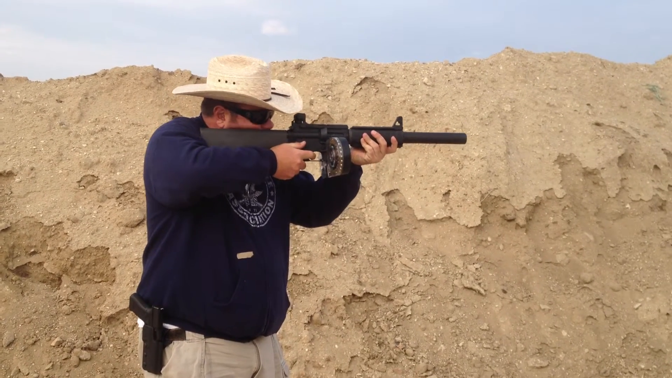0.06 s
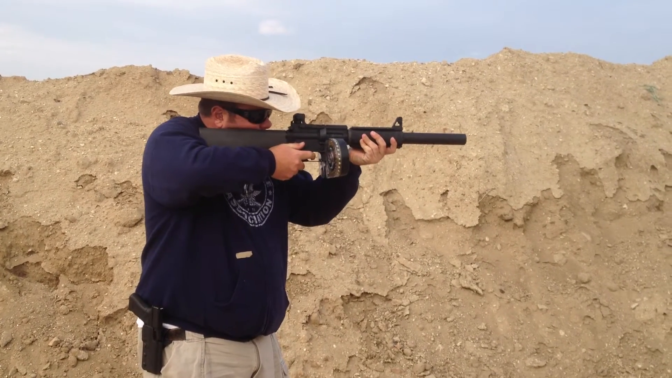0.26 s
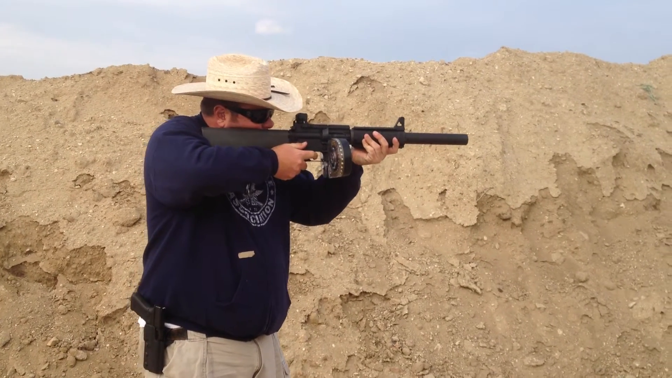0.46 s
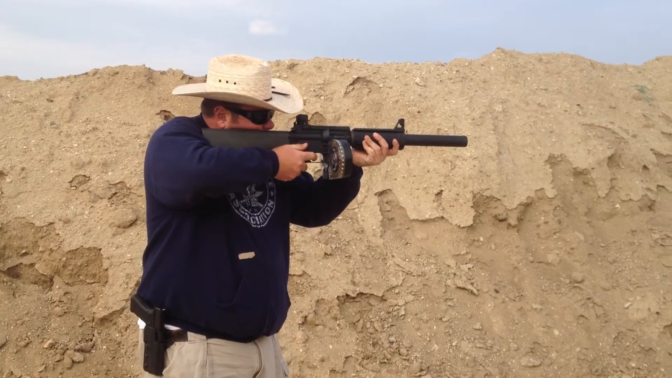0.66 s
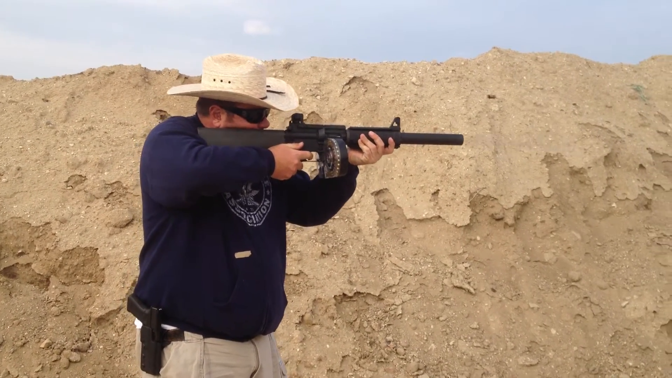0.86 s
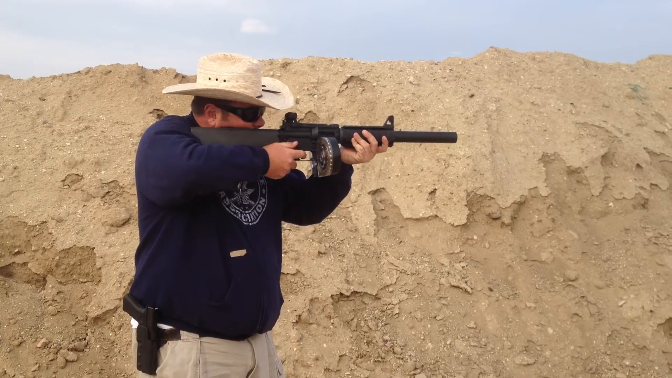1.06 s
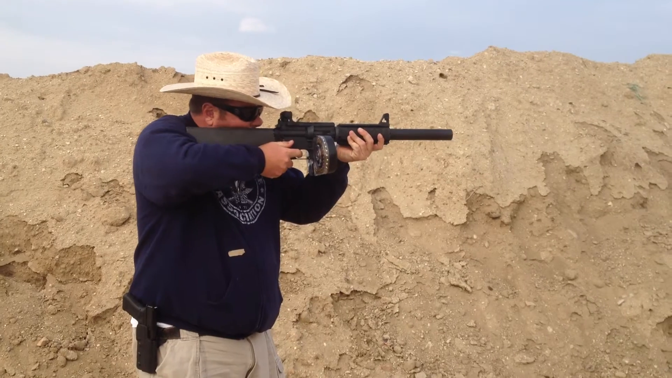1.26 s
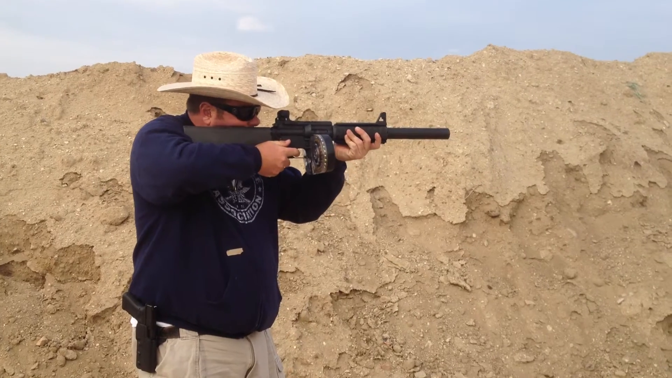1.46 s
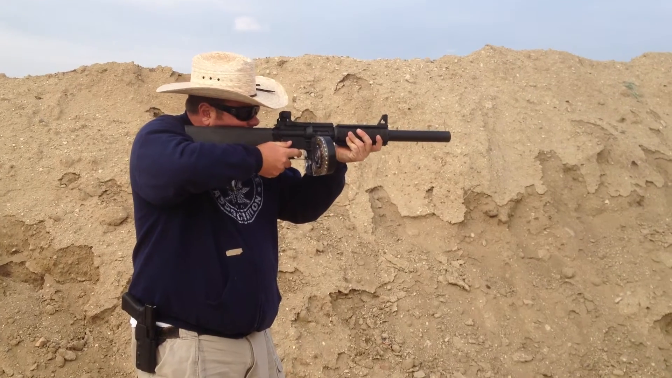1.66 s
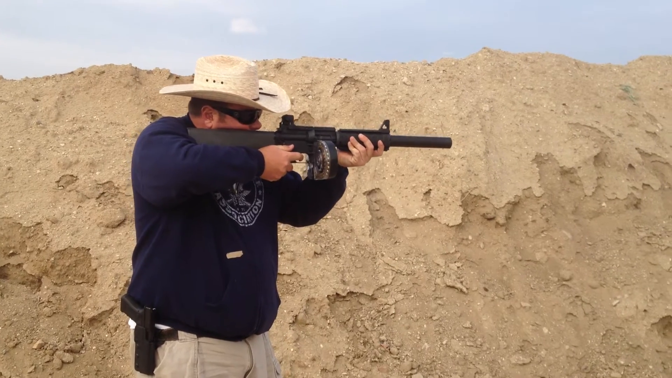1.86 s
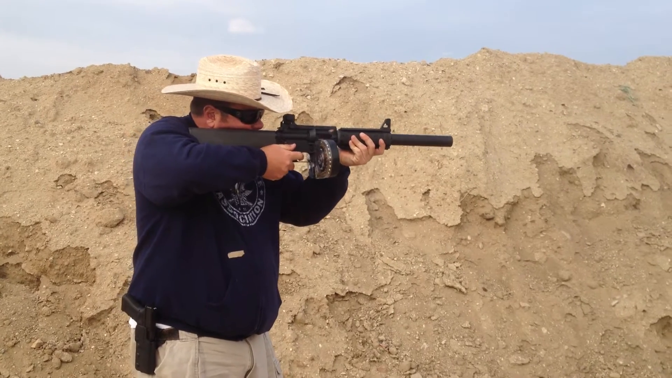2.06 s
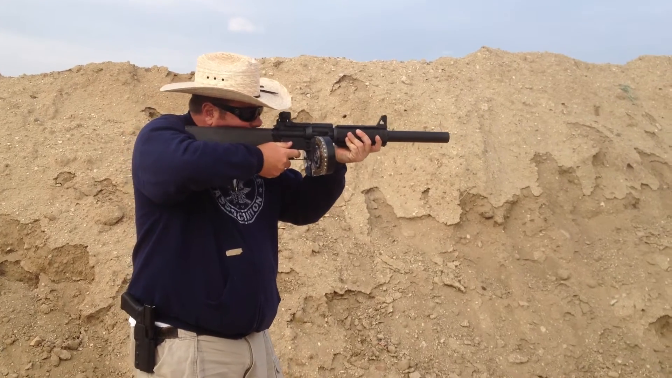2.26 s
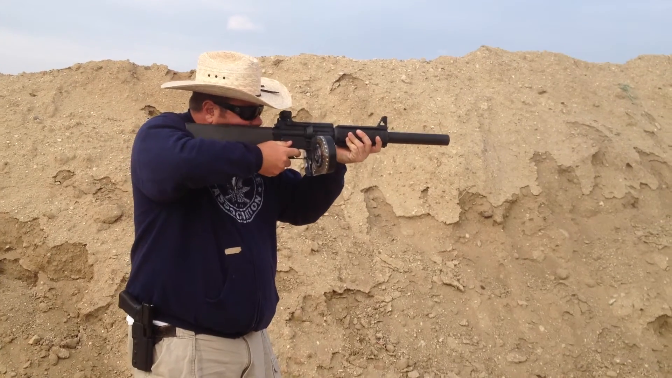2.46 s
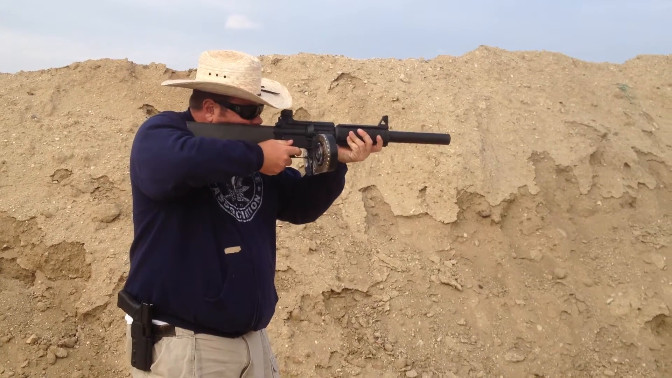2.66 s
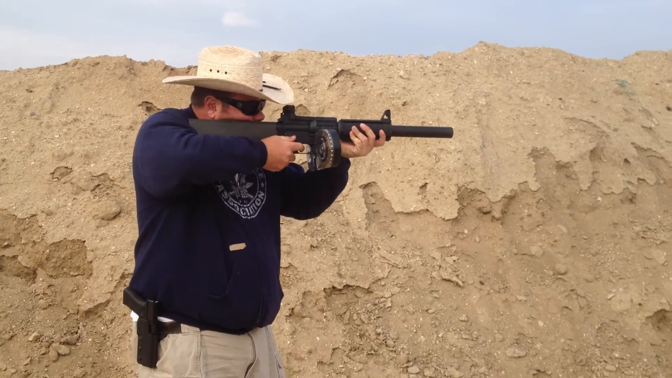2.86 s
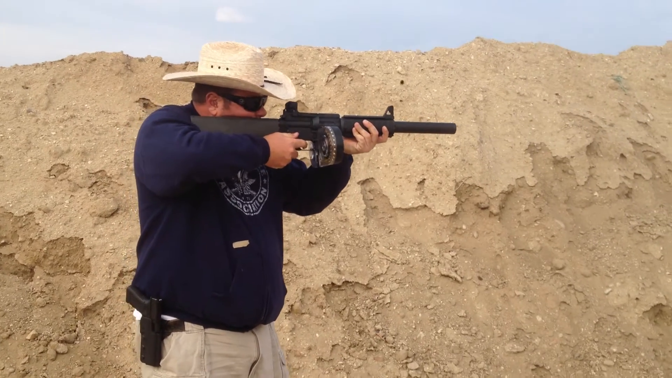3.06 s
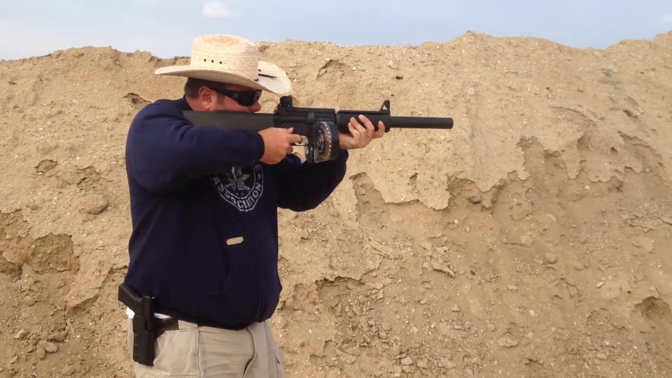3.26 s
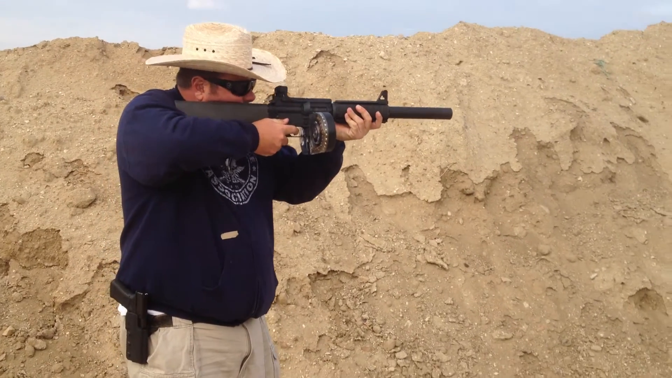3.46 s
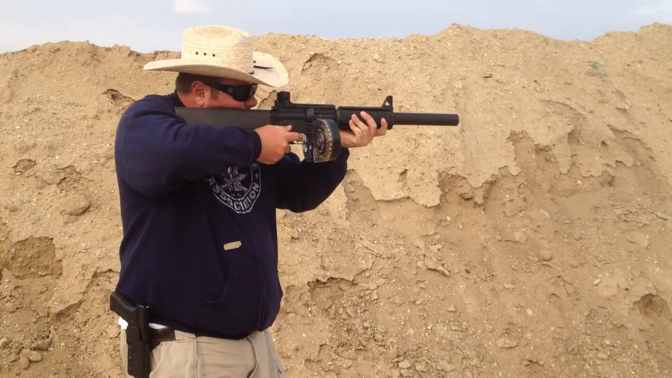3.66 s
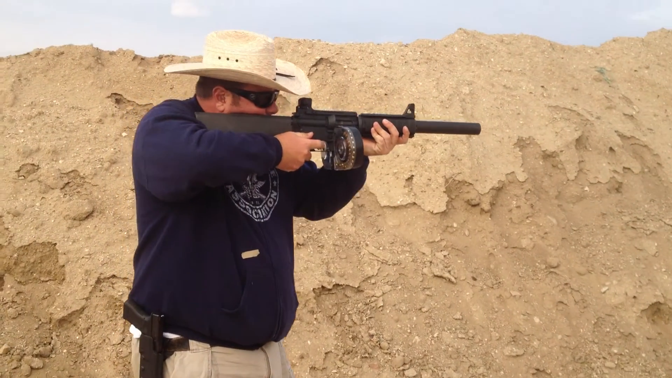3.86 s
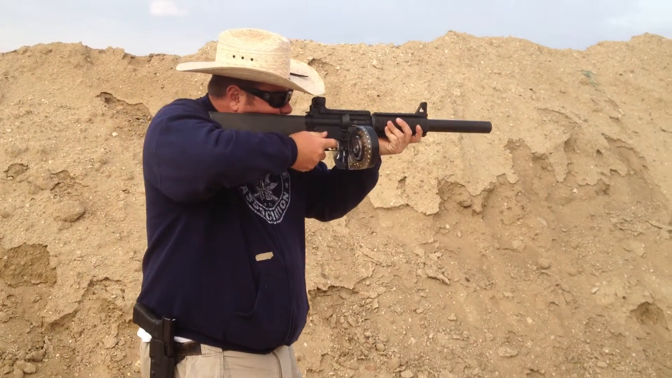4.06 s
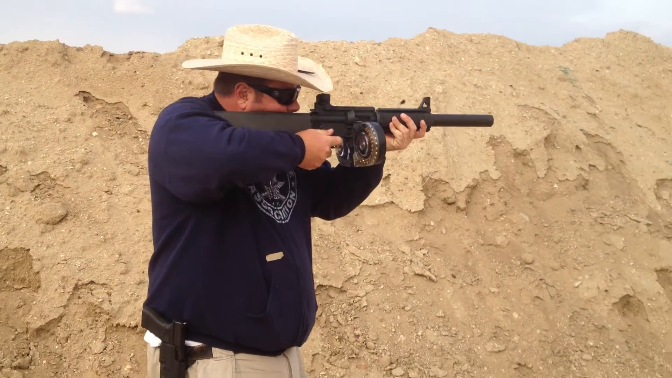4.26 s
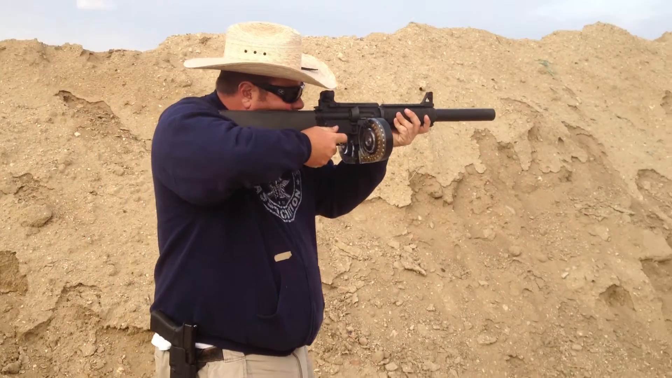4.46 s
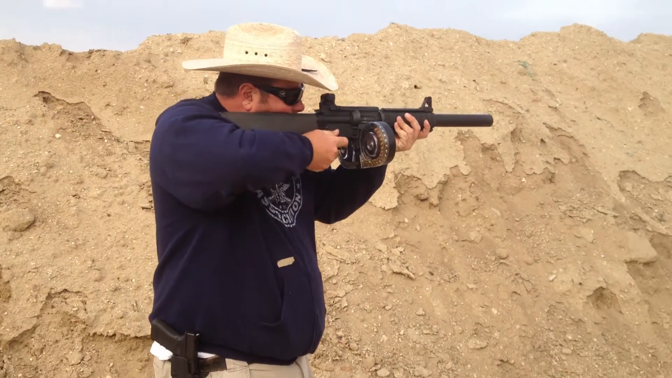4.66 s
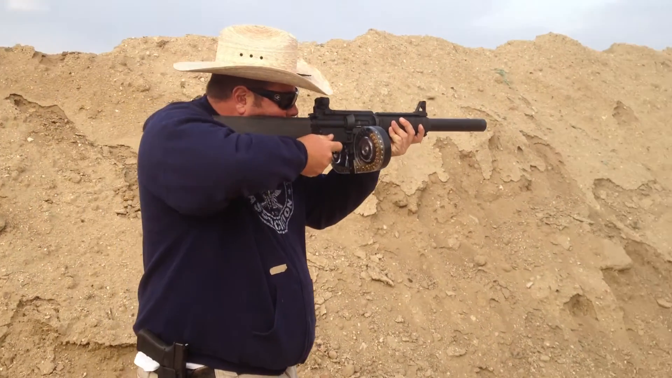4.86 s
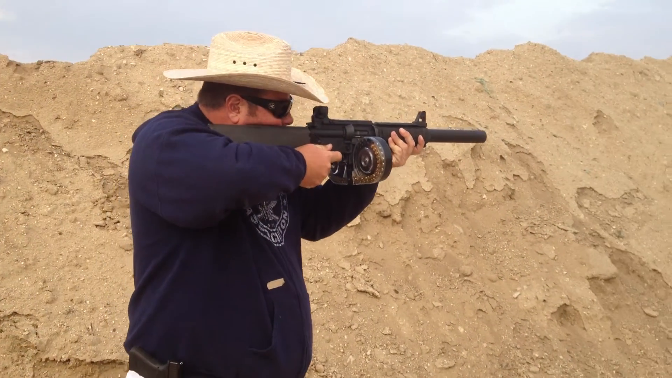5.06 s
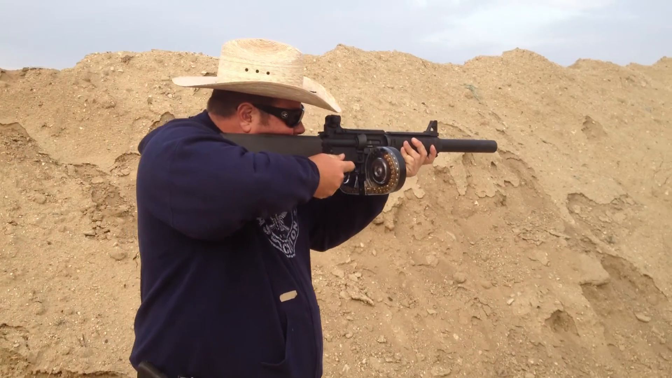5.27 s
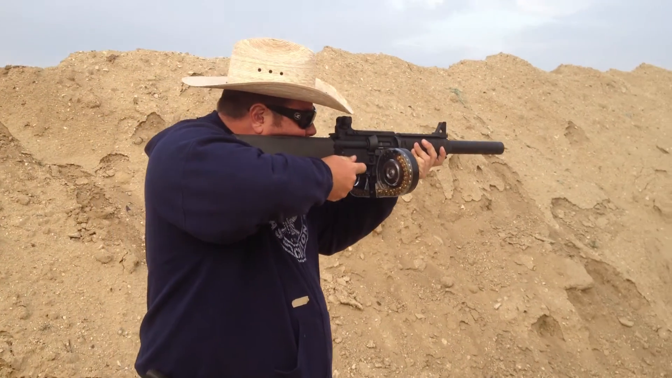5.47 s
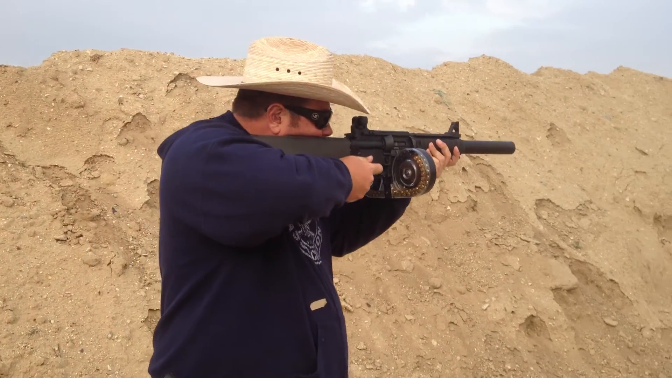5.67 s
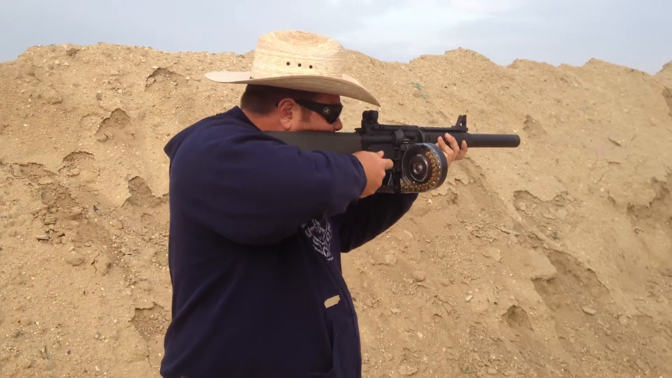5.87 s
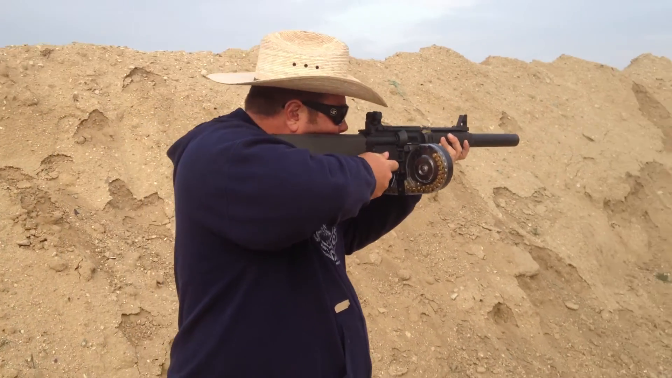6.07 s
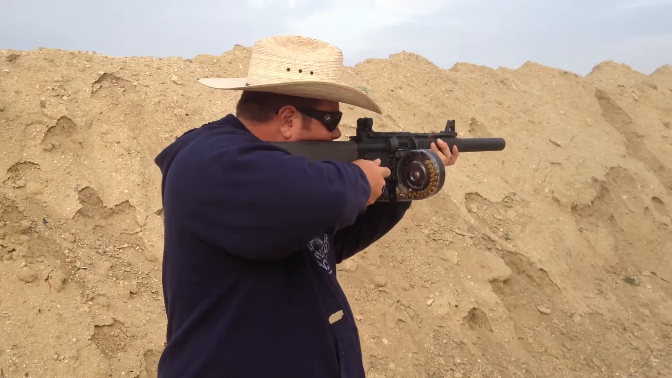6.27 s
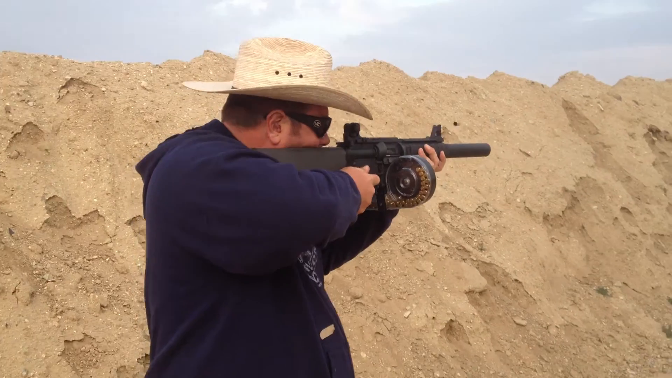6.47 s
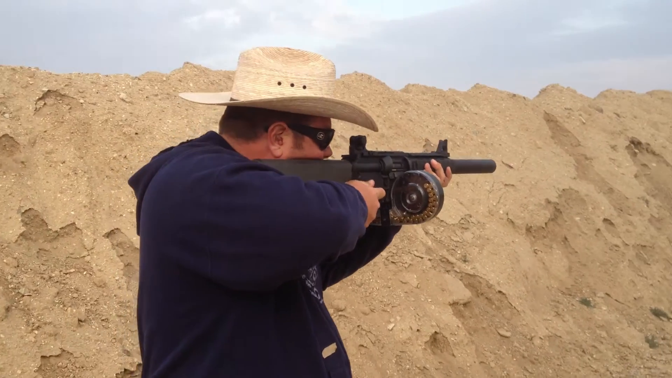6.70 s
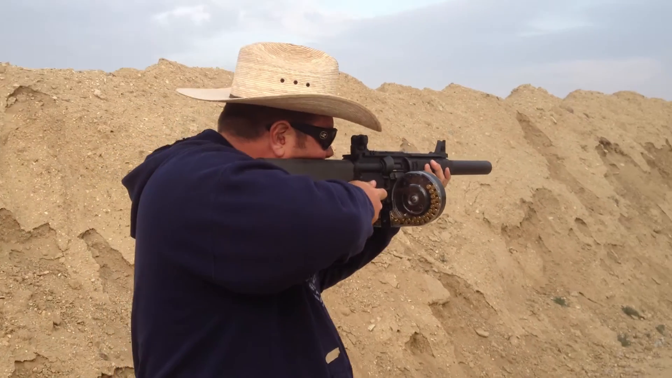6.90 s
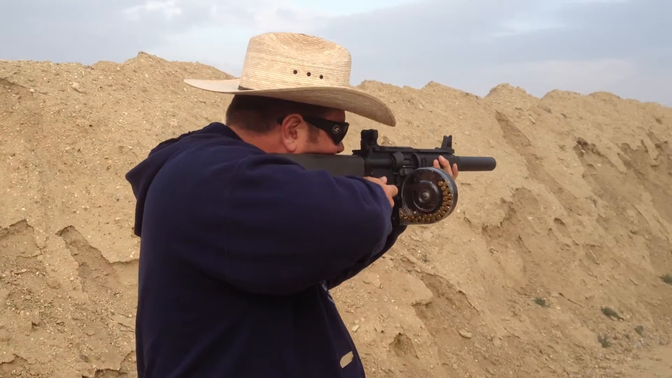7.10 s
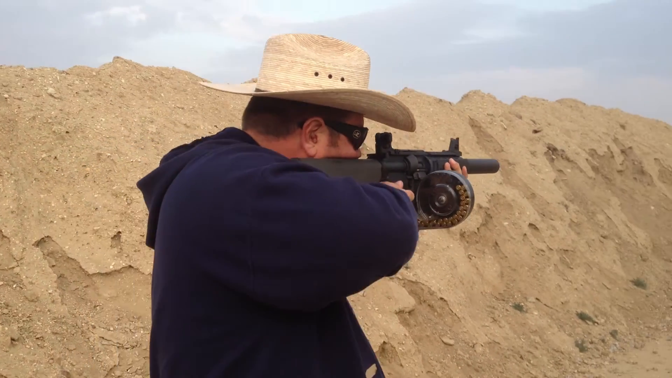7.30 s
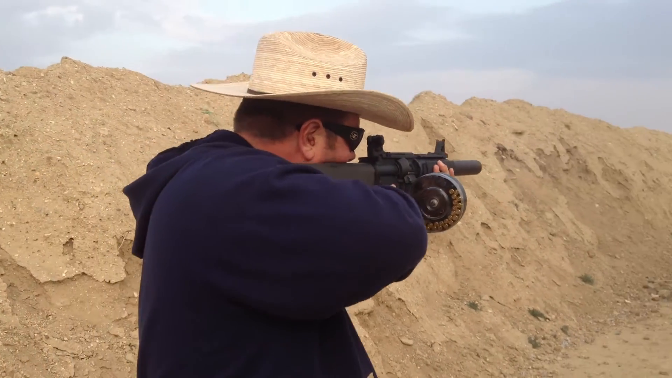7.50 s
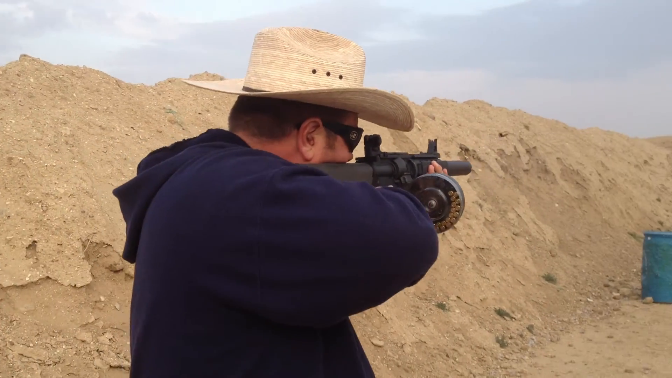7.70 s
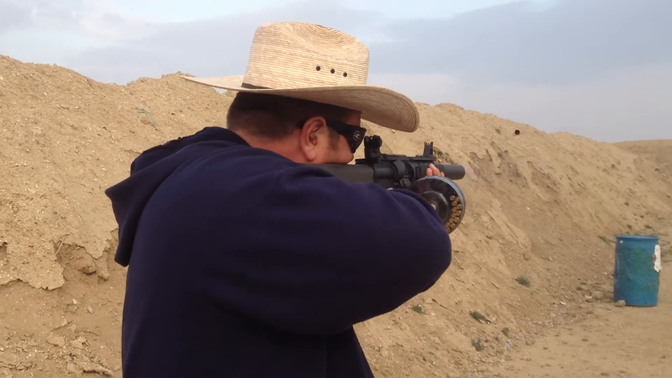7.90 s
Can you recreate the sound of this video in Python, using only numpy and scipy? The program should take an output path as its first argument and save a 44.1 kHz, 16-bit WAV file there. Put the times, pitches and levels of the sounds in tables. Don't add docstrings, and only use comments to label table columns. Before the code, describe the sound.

A suppressed carbine is fired close by among earth banks, overloading the microphone. One shot opens at 0.03 s; its slaps and hiss fade, and a brass case ticks around 0.4. Five shots follow from 0.74 to 1.45, about 0.18 s apart, then a gap with tinkling brass. A longer string of nine runs from 2.1 to 3.56. Each shot is a blunt noisy crack and falling puff, a steel bolt clack about 0.06 s later, a small trigger click, and bank echoes up to 0.17 s. Wind rumble rises around 3.2-4.2 while cases ring. Four shots run 4.27-4.86; in the next pause brass tinkles, gusts buffet and a distant gun cracks at 5.55. Five shots follow, 5.73-6.47, then grit rustles and cases clink. Four last shots, 7.28-7.89, are heard from behind, with later echoes and the bolt more shielded.

```python
import sys
import numpy as np
from scipy import signal
from scipy.fft import rfft, irfft
from scipy.io import wavfile
from scipy.ndimage import uniform_filter1d

SR = 44100
rng = np.random.default_rng(int(sys.argv[2]) if len(sys.argv) > 2 else 0)


def rack_gain(trim_db):
    fader = np.asarray(trim_db, float)
    return 10 ** (fader / 20)


def waveform_to_disk(signal):
    frames = np.transpose(np.atleast_2d(signal))
    scaled = np.clip(frames, -1, 1) * 32767
    samples = np.round(scaled).astype(np.int16)
    wavfile.write(sys.argv[1], SR, samples)


N = 350154
LENGTH = 12288
T = np.arange(LENGTH) / SR

# (time [s], bolt closes after [ms], trigger resets after [ms], reset level [dB])
SHOTS = [(0.029, 64.1, 160, -30), (0.7379, 62, 105, -33), (0.917, 66, 110, -46.5), (1.088, 63, 104, -62.5),
         (1.2645, 66, 106, -36), (1.4488, 63.0, 153, -34.5), (2.0971, 65, 115, -34.5),
         (2.271, 62, 115, -40), (2.448, 61.5, 110, -35), (2.625, 61, 119.5, -35.5),
         (2.807, 66.5, 128.0, -34), (2.996, 64.4, 127, -35), (3.189, 63, 126, -33),
         (3.3717, 63.0, 130, -33.5), (3.5617, 63.9, 137, -33), (4.273, 63.3, 126, -30.5),
         (4.462, 59.6, 120, -32), (4.6577, 60, 123, -32.5), (4.856, 62.7, 123.6, -31.5),
         (5.729, 63, 120.2, -31), (5.917, 66, 115, -29), (6.0987, 64, 123, -30), (6.2885, 68, 120.7, -30),
         (6.4677, 62.6, 120, -28), (7.278, 66, 136, -31.5), (7.496, 64.6, 116, -30), (7.694, 61, 129, -33),
         (7.8914, 61, 140, -43)]
# (frequency [Hz], level [dB])
BLAST = [(20, -40), (100, -15), (177, -4.5), (337, -7.5), (624, -2.5), (1150, -12), (1960, -10),
         (2460, -3.5), (2750, -6.5), (4060, -7), (5230, -12.5), (7520, -10), (9950, -19), (13900, -14.5),
         (16000, -19.5)]
# (frequency [Hz], level [dB])
VALLEY = [(59, -53), (100, -16.5), (229, 3.5), (1480, 2.5), (1910, -4), (2420, -0.5), (5420, -14.5),
          (6840, -14), (7450, -6.5), (14400, -28), (16000, -37.5)]
# (frequency [Hz], level [dB])
SNAP = [(180, -56), (300, -16), (2000, -2), (3890, -0.5), (4990, -12.5), (8220, -3), (10200, -18.5),
        (11300, -13), (13800, -17), (15000, -14), (16000, -55.5)]
# (frequency [Hz], level [dB])
HILLS = [(240, -40), (400, -4.5), (1400, -7.5), (2400, -8), (3200, -17), (4100, -15), (4700, -27.5),
         (8000, -33), (15000, -52)]
# (frequency [Hz], width [Hz], level [dB])
BODY = [(844, 140, 7), (1574, 330, 8.5), (2520, 180, 4), (4020, 220, 4.5), (7100, 110, -6.5),
        (3250, 180, 3)]


def curve(table, hz):
    points = np.array(table)
    return np.interp(np.log(hz + 1), np.log(points[:, 0]), points[:, 1])


def colour(x, spectrum, peaks=()):
    hz = np.fft.rfftfreq(x.shape[-1], 1 / SR)
    resonance = sum(db / (1 + (2 * (hz - f) / width) ** 2) for f, width, db in peaks)
    gain = rack_gain(curve(spectrum, hz) + resonance)
    return irfft(rfft(x) * gain / np.sqrt(np.mean(gain ** 2)), x.shape[-1])


def fade(t, t60):
    return (t >= 0) * np.exp(-np.log(1000) * np.maximum(t, 0) / t60)


def burst(noise, spectrum, t60s, rise_s, body=BODY):
    spec = rfft(colour(noise, spectrum, body))
    hz = np.fft.rfftfreq(LENGTH, 1 / SR)
    out = 0
    for centre in 2. ** np.arange(5, 15):
        octaves = np.log2(np.clip(hz, 32, 16384) / centre)
        band = irfft(spec * np.clip(1 - abs(octaves), 0, 1), LENGTH)
        out = out + band * fade(T, curve(t60s, centre))
    return out * np.minimum(T / rise_s, 1)


def puff(t, start_hz, end_hz, length_s):
    u = np.clip(t / length_s, 0, 1)
    cycles = length_s * (start_hz * u + (end_hz - start_hz) * u ** 2 / 2)
    return np.sin(np.pi * u) ** 2 * np.sin(2 * np.pi * cycles)


def slap(t, db, hz, length_s, thump_db, dull=1):
    treble = rack_gain(db) * puff(t, 1.119 * hz, 0.44 * hz, length_s)
    push = puff(t - 0.31 * length_s, 757 / dull, 210 / dull, 0.0048 * dull)
    return treble + rack_gain(thump_db) * push


def patchy(x, db, size):
    drift = uniform_filter1d(rng.standard_normal(x.shape), size=size)
    return x * rack_gain(db * np.sqrt(size) * drift)


def white(count):
    return rng.standard_normal((count, LENGTH))


def spread(count):
    return rng.standard_normal((count, 1))


def alike(count, share):
    common, own = white(1), white(count)
    low = signal.butter(2, 3000, fs=SR, output="sos")
    return own + signal.sosfilt(low, np.sqrt(share) * common + (np.sqrt(1 - share) - 1) * own)


def add(out, times, sounds):
    for s, sound in zip(times, sounds):
        i = int(round(s * SR))
        out[i:i + LENGTH] += sound * np.minimum((T[-1] - T) / .14, 1)


def air():
    # (time [s], level [dB])
    gusts = [(0, -67.5), (.45, -69), (.65, -63), (1.2, -66), (1.7, -68.5), (2.05, -73), (3.2, -53),
             (3.8, -51), (4.02, -48.5), (4.2, -46.5), (5.1, -54.5), (5.28, -49), (5.45, -48.5), (5.62, -47),
             (6.7, -68.5), (6.95, -55.5), (7.1, -52.5), (7.3, -53.5)]
    # (frequency [Hz], level [dB])
    rumble = [(15, -69.5), (60, -24.5), (110, -9), (157, -0.5), (237, -6), (350, -14.5), (450, -30),
              (1000, -47.5), (2200, -100)]
    # (frequency [Hz], level [dB])
    fabric = [(2500, -28), (4000, 0), (7000, -2), (9000, -1.5), (13000, 1), (15500, -10)]
    t = np.arange(N) / SR
    gust_db = np.interp(t, *np.transpose(gusts))
    shots = np.array(SHOTS)[:, 0]
    since = np.maximum(t - shots[np.maximum(np.searchsorted(shots, t) - 1, 0)], 0)

    flutter_db = 80 * uniform_filter1d(rng.standard_normal(N), size=900)
    flutter_db += 90 * uniform_filter1d(rng.standard_normal(N), size=3000)
    wind = colour(rng.standard_normal(N), rumble) * rack_gain(gust_db + flutter_db)
    deep = signal.sosfiltfilt(signal.butter(2, 105, fs=SR, output="sos"), wind)
    wind = wind - deep * (1 - rack_gain(np.minimum(0.8 * (gust_db + 48.0), 3)))

    rustle = rack_gain(-89 + .25 * (gust_db + 54.0))
    rustle += rack_gain(-66) * fade(since, 0.5) + rack_gain(-46.5) * fade(since, 0.4)
    rustle += rack_gain(-65.5) * fade(t - 6.66, 1.6)
    cloth = patchy(colour(rng.standard_normal(N), fabric), 2.8, size=150) * rustle

    scatter = rack_gain(-71 + .5 * (gust_db + 56.0)) + rack_gain(-46) * fade(since, 0.79)
    hills = patchy(colour(rng.standard_normal(N), HILLS), 3.0, size=250)
    return wind + cloth + patchy(hills, 5, size=2500) * scatter


def thuds(out):
    # (time [s], level [dB], pitch [Hz], thump relative to level [dB])
    returns = [(0.25, -35, 401, 6.5), (.292, -54, 500, 6), (0.33, -45.5, 883, -4), (0.347, -52, 1000, -8),
               (.418, -56, 500, 4), (1.674, -33, 398, 3), (1.75, -47, 1370, -3), (1.863, -42, 404, -0.5),
               (3.78, -29, 444, -5), (4.108, -25.5, 920, -16), (5.065, -26, 1340, -14),
               (5.074, -27, 2200, -23), (5.66, -38, 2270, -22), (6.696, -33, 403, 1), (6.763, -53, 600, -2),
               (6.773, -45, 452, -1), (3.864, -45, 1390, -12), (3.923, -49, 1320, -10),
               (3.995, -52, 1800, -8), (3.734, -21.5, 1520, -11), (7.168, -57.5, 1780, -10.5),
               (7.258, -36.5, 2200, -15), (2.077, -54, 2200, -14), (5.385, -58, 870, -7),
               (5.175, -46, 2000, -16), (4.117, -49, 2000, -15), (6.799, -40, 413, -2)]
    # (time [s], level [dB])
    earlier = (0.0027, -17.5)
    s, db, hz, thump_db = np.transpose(returns)[:, :, None]
    smear = rack_gain(db - 9.5) * colour(white(len(s)), HILLS) * fade(T - .001, 0.032)
    dull_slap = slap(T, db - 2.5, 1.39 * np.maximum(hz, 1000), 0.003, db + thump_db, 1.56)
    add(out, s[:, 0] + 0.00042, dull_slap + smear)
    rough = rack_gain(-30.5) * colour(white(1), SNAP)[0] * fade(T, .02)
    add(out, [earlier[0]], [slap(T, earlier[1], 1800, 0.004, -24.5) + rough])
    add(out, [0], rack_gain(-50.0) * colour(white(1), VALLEY) * fade(T, .3))


def snaps(out):
    # (time [s], level [dB], knock pitch [Hz], knock level [dB], high ping level [dB])
    cracks = [(0.2124, -15.5, 2300, -20.5, -26.5), (1.6331, -14, 3630, -14.5, -26),
              (2.9909, -16, 2400, -29, -32.5), (3.179, -42, 2400, -53, -50), (3.5548, -20.5, 2400, -19, -35),
              (3.7461, -19.5, 2400, -23, -30), (4.4604, -33.5, 2400, -43, -46), (4.65, -19.5, 2310, -22, -30),
              (4.8442, -17, 2400, -20, -24), (5.0413, -19, 2160, -12, -17.5),
              (5.9158, -9.5, 2150, -21.5, -24.5), (6.2866, -18, 2300, -22, -22),
              (6.656, -23, 1990, -14.5, -15), (7.4634, -29.5, 1990, -42, -24), (7.684, -20, 2310, -19.5, -16),
              (7.88, -15, 2280, -25.5, -11), (1.4456, -27, 2290, -31.5, -29),
              (6.4607, -39, 2310, -45.5, -38.5), (0.0189, -17, 2300, -16, -36)]
    s, db, hz, knock_db, ping_db = np.transpose(cracks)[:, :, None]
    shape = fade(T, .003) + .5 * fade(T - .0006, .005) + .12 * fade(T, .015) + .03 * fade(T, .08)
    high = signal.butter(3, 900, "high", fs=SR, output="sos")
    snap = signal.sosfilt(high, colour(white(len(s)), SNAP, BODY) * shape)
    add(out, s[:, 0] - .0005, rack_gain(db + 3.5) * snap)
    ping_hz = 8000 * (1 + 0.074 * spread(len(s)))
    knock = rack_gain(knock_db) * puff(T, hz, hz, 0.0018)
    ping = rack_gain(ping_db) * puff(T, 1.04 * ping_hz, .96 * ping_hz, 0.0022)
    add(out, s[:, 0] - .001, knock + ping)


def carbine(out):
    # (time [s], extra path to the banks [ms], bolt level past the shooter's body [dB])
    walk = [
        (0, 0.29, -10),
        (1.3, .45, -12),
        (2.1, 0.87, -10.5),
        (3.5, 1.2, -9.5),
        (4.86, 4, -8),
        (5.8, 3.2, -9.5),
        (6.4, 5.2, -11.5),
        (7.3, 5.3, -11),
        (7.9, 5.8, -16.5),
    ]
    s, bolt_ms, reset_ms, reset_db = np.transpose(SHOTS)[:, :, None]
    walk_s, walk_path, walk_bolt = np.array(walk).T
    path = np.interp(s, walk_s, walk_path)
    bolt_db = np.interp(s, walk_s, walk_bolt)
    heat = rng.standard_normal((len(s), len(BODY), 2, 1))
    hammer(out, s)
    blast(out, s, path, heat)
    bolt_slam(out, s, bolt_ms, reset_ms, path, bolt_db)
    trigger_reset(out, s, reset_ms, reset_db, heat)


def hammer(out, s):
    n = len(s)
    shape = fade(T, 0.0029) + 2.7 * fade(T - .004, .02)
    tick = colour(white(n), SNAP, [(2645, 540, 7.4)]) * shape
    add(out, s[:, 0] - .0055, rack_gain(-34.0 + 2 * spread(n)) * tick)


def diaphragm():
    shoves = [-31.5, -27.5, -35, -26, -33, -31, -28.5, -27, -21, -29.5, -33, -18, -23.5, -30, -24.5, -27.5,
              -24, -23, -26, -31.5, -34, -31, -25.5, -31, -33.5, -30, -35.5, -37]
    # (time [s], level [dB], pitch [Hz], length [s])
    buffets = [
        (.61, -49, 136, .035),
        (.655, -46, 125, .05),
        (0.708, -47, 150, .03),
        (3.95, -47, 152, 0.054),
        (4.19, -36.5, 169, 0.067),
        (5.28, -41.5, 130, 0.037),
        (5.5, -40, 140, 0.038),
        (7.07, -44.5, 191, .06),
        (7.1, -54, 401, .03),
        (7.2, -50.5, 200, 0.038),
    ]
    out = np.zeros(N + 2 * LENGTH)
    shove_s = 0.013
    swing = puff(T, .5 / shove_s, .5 / shove_s, shove_s)
    swing = swing - 0.35 * puff(T - shove_s, 55, 55, 0.0052)
    add(out, np.array(SHOTS)[:, 0] - .002, rack_gain(np.array(shoves)[:, None]) * swing)
    s, db, hz, length = np.transpose(buffets)[:, :, None]
    add(out, s[:, 0], rack_gain(db) * puff(T, 1.2 * hz, .85 * hz, length))
    return out[:N]


def blast(out, s, path, heat):
    # (frequency [Hz], T60 [s])
    blast_t60 = [(30, 0.038), (150, 0.076), (500, 0.12), (1500, 0.22), (4000, 0.11), (8000, 0.19),
                 (15000, 0.17)]
    # (frequency [Hz], width [Hz], level [dB])
    gully = [(1430, 260, 8.5), (2440, 400, 4.5), (800, 200, 7), (4020, 400, 5.5)]
    # (thump level [dB], low-mid resonance [dB])
    loads = [(-31.5, -6), (-26, -1.5), (-30, -3.5), (-25.5, -2), (-27, -3.5), (-28, -1), (-27, -1),
             (-24.5, -2.5), (-28, -3), (-17, 0.5), (-43, 0.5), (-34.5, 2), (-32.5, 0.5), (-37.5, -3),
             (-32, 0), (-28, -0.5), (-33, -2.5), (-37, 3), (-21.5, 4.5), (-37.5, 1.5), (-30, 0),
             (-27, -2.5), (-38, -2.5), (-18, -3.5), (-22.5, -4.5), (-21, -7), (-27.5, -3), (-56, -1)]
    n = len(s)
    thump_db, low_db = np.transpose(loads)[:, :, None]
    body = [(f * (1 + .035 * heat[:, k, 0]), w, db + 2.5 * heat[:, k, 1])
            for k, (f, w, db) in enumerate(BODY)]
    hollows = [(f * (1 + .06 * heat[:, k, 1]), w, db + 2 * heat[:, k, 0])
               for k, (f, w, db) in enumerate(gully)]
    gas = patchy(alike(n, 0.11), 2.5, size=80)
    shot = rack_gain(-6.5) * burst(gas, BLAST, blast_t60, 0.002, body + [(480, 240, low_db)])
    full_s = .008
    shot *= 1 + 0.75 / (1 + (T / full_s) ** 6) - 0.017 * path * (T > full_s)
    shot += rack_gain(-26.0) * patchy(colour(white(n), VALLEY, hollows), 4, size=150) * fade(T, 0.48)
    shot += banks(path, n)
    thump = 1.8 * puff(T, 240, 170, 0.021) * fade(T, 0.099) + 0.55 * puff(T, 78, 60, 0.0054)
    add(out, s[:, 0], shot + rack_gain(thump_db) * thump)


def banks(path, n):
    # (lag [ms], share of extra path [0-1], level [dB], pitch [Hz], thump level [dB])
    echoes = [
        (0, 0.21, -12.5, 2500, -4),
        (3.77, 0.14, -20, 1800, -16.5),
        (18.12, 0.86, -19.5, 1800, -26),
        (29.3, 0.24, -20, 4300, -33),
        (42.47, 0.63, -9, 1600, -17.5),
        (54.26, 0.87, -9.5, 1707, -31),
        (73.4, 0.75, -30.5, 870, -48.5),
        (81.9, 0.83, -24.5, 1900, -20.5),
    ]
    out = 0
    for lag_ms, share, db, hz, thump_db in echoes:
        length_ms = 4.1 - (4.1 - 2.78) * np.exp(-lag_ms / 1.5)
        t = T - (lag_ms + share * path) / 1000
        echo_db = db - 0.67 * share * path + 2.1 * spread(n)
        echo_hz = hz * (1 + 0.1 * spread(n))
        push_db = thump_db - 3 * path * max(1 - 1.1 * share, 0)
        out = out + slap(t, echo_db, echo_hz, length_ms / 1000, push_db, 1 + 0.06 * path)
        out += rack_gain(db - 12.5) * colour(white(n), SNAP) * fade(t - .001, 0.02)

    near = T - (11 + 1.0 * path) / 1000
    near_shape = fade(near, 0.027) * np.clip(near / 0.0047, 0, 1)
    out += rack_gain(-17.5 + 3 * path) * colour(white(n), BLAST, BODY) * near_shape

    far = T - (164.8 + 0.75 * path) / 1000
    bright = colour(white(n), [(800, -28.0), (1600, -4.5), (3600, 0.5), (5000, -12.5), (8000, -8.0), (15000, -14.5)])
    out += rack_gain(-40.0 + 1.6 * path) * bright * fade(far - .0005, 0.009)
    slope = colour(white(n), [(1000, -33.5), (1900, -8.0), (2350, -0.5), (2900, -16.0), (5000, -36.5)])
    slope *= rack_gain(-38.5 + 3.3 * spread(n))
    return out + slope * np.sin(np.pi * np.clip((far + .016) / .018, 0, 1))


def bolt_slam(out, s, bolt_ms, reset_ms, path, bolt_db):
    # (frequency [Hz], level [dB])
    slam = [(180, -39.5), (300, -17.5), (1100, -4.5), (1930, -11.5), (3240, 0), (3800, -9), (4400, -7.5),
            (5340, -27.5), (6960, -9.5), (14200, -10.5)]
    # (frequency [Hz], T60 [s])
    slam_t60 = [(500, 0.13), (2000, 0.062), (5000, 0.089), (14000, 0.0077)]
    # (frequency [Hz], level [dB], T60 [s])
    steel = [(6970, -42, 0.99), (6700, -46.5, 0.4), (7200, -39.5, 0.11), (1340, -34, 0.066),
             (2400, -45, 0.1)]
    n = len(s)
    bolt = rack_gain(bolt_db - 3.0) * burst(white(n), slam, slam_t60, 0.00094)
    bolt *= 0.75 + 1.0 * fade(T - .0005, 0.02) + .5 * fade(T - .005, 0.012)
    damped = fade(np.maximum(T - (reset_ms - bolt_ms) / 1000, 0), 0.2)
    quiver = patchy(np.ones((n, LENGTH)), 3.5, size=250)
    for hz, db, t60 in steel:
        mode = np.sin(2 * np.pi * hz * T * (1 + 0.001 * spread(n))) * fade(T, t60)
        bolt += rack_gain(db - 1.1 * path + 1.4 * spread(n)) * mode * damped * quiver
    add(out, (s + bolt_ms / 1000)[:, 0] - .0015, bolt)


def trigger_reset(out, s, reset_ms, reset_db, heat):
    # (frequency [Hz], level [dB])
    parts = [(1500, -12.5), (3000, 5), (5000, -2.5), (8000, 3.5), (12000, -3.5), (16000, -6)]
    n = len(s)
    modes = [(2300 * (1 + .1 * heat[:, 0, 0]), 400, 6), (3900, 300, 4 + 4.0 * heat[:, 1, 0]), (7700, 500, 5)]
    rattle = colour(white(n) * rack_gain(3.6 * white(n)), parts, modes)
    rattle *= fade(T, 0.027) + 0.53 * fade(T - .005, 0.023)
    add(out, (s + reset_ms / 1000)[:, 0] - .0015, rack_gain(reset_db - 4.0) * rattle)


def far_bank(out):
    # (middle of return after [ms], pitch [Hz], level [dB], overtone level [dB])
    answers = [(167.2, 1442, -19.3, -11.5), (167.4, 1485, -19.5, -15.4), (167.6, 1464, -21.8, -14.8),
               (167.5, 1507, -21.3, -19.3), (168.0, 1507, -20.7, -18.1), (167.6, 1464, -22.5, -15.4),
               (167.9, 1485, -19.8, -9.8), (168.2, 1485, -18.0, -15.6), (167.9, 1485, -17.5, -16.2),
               (167.7, 1464, -18.5, -13.5), (167.4, 1485, -18.3, -19.1), (167.9, 1442, -19.6, -17.1),
               (168.0, 1442, -19.8, -21.5), (168.0, 1421, -20.2, -16.8), (168.6, 1421, -20.4, -15.1),
               (169.6, 1313, -21.5, -9.9), (169.1, 1421, -22.4, -10.3), (169.0, 1399, -22.2, -11.6),
               (168.8, 1421, -21.8, -11.6), (169.5, 1485, -21.3, -15.4), (171.8, 1378, -20.4, -18.2),
               (171.4, 2454, -18.3, -23.7), (172.0, 2411, -17.8, -23.8), (171.0, 2368, -17.7, -23.2),
               (171.6, 1765, -19.6, -8.5), (170.8, 1787, -21.1, -8.5), (170.6, 1701, -21.2, -9.1)]
    lag_ms, hz, db, over_db = np.transpose(answers)[:, :, None]
    n = len(hz)
    puff_s = .005
    main = puff(T, 1.05 * hz, 0.9 * hz, puff_s) + rack_gain(-8.5) * puff(T - .0012, 1100, 250, 0.0057)
    over = rack_gain(over_db - 0.5) * puff(T - .0003, 4100 * (1 + 0.044 * spread(n)), 3900, 0.0044)
    over += rack_gain(-20.5) * puff(T - .0008, 7000 * (1 + 0.033 * spread(n)), 6800, .004)
    second = rack_gain(-8.0 + 3.2 * spread(n)) * puff(T - .001, 3950 - hz, 3700 - hz, 0.0033)
    rough = rack_gain(-16.5) * colour(white(n), SNAP) * fade(T - .001, 0.031)
    times = np.array(SHOTS)[:n, 0] + lag_ms[:, 0] / 1000 - puff_s / 2
    add(out, times, rack_gain(db + 2.0) * (main + over + second + rough))


def swells(out):
    # (time [s], level [dB], pitch [Hz], length [s])
    slopes = [(0.221, -40.5, 1480, 0.048), (0.332, -61, 2280, 0.15), (1.643, -40.5, 1520, 0.043),
              (1.765, -67, 2100, 0.1), (3.751, -38, 2010, 0.035), (1.797, -62.5, 1596, 0.047),
              (3.858, -71, 2000, 0.055), (3.912, -59, 1510, 0.09), (4.048, -51.5, 2040, 0.068),
              (5.497, -57, 1500, 0.12), (6.768, -59, 2500, 0.13), (7.169, -61, 2010, 0.08),
              (5.039, -39.5, 2200, 0.056), (5.177, -64, 2220, 0.092), (6.659, -43, 2260, 0.053),
              (6.996, -56.5, 2450, 0.034)]
    spectrum = [(200, 11.0), (1000, 0.5), (4000, -5), (9000, -8), (15000, -20)]
    for s, db, hz, length in slopes:
        band = colour(white(1), spectrum, [(hz, 0.38 * hz, 14)])
        u = T / (0.35 * length)
        add(out, [s], rack_gain(db) * patchy(band, 2.2, size=200) * (u * np.exp(1 - u)) ** 1.4)


def cases(out):
    # (time [s], tick level [dB], ring pitch [Hz], ring level [dB], brightness [0-1])
    landings = [(0.4075, -33, 10400, -44, 0.1), (0.5846, -35.5, 10290, -43.5, 0.7),
                (0.6878, -53, 10300, -46, 0.5), (1.666, -25, 10320, -43, 0.03),
                (1.8557, -29.5, 10400, -34.5, 0.14), (1.8678, -46, 10180, -50, 0.65),
                (1.9735, -35, 10300, -59, 0.78), (2.0623, -41, 10400, -48, 0.5),
                (3.7614, -34, 10360, -43.5, 0.7), (3.846, -69.5, 10460, -50.5, .5),
                (7.015, -65, 10580, -52, 0.57), (5.552, -60, 10350, -50, .5),
                (3.9389, -36, 10330, -44, 0.9), (4.1351, -30.5, 10300, -40.5, 0.73),
                (5.228, -44, 10300, -42.5, 0.9), (5.3258, -44, 10200, -60, 0.46),
                (5.3538, -36.5, 10350, -40, 0.9), (5.444, -29, 10500, -41.5, 0.3),
                (5.4632, -43, 10500, -61, 1), (5.6093, -43, 10300, -54, 0.66),
                (5.6187, -38, 10300, -39, 0.66), (6.723, -44, 10370, -53, 0.5),
                (6.8283, -40.5, 10460, -43.5, 0.5), (7.0374, -38, 10200, -57.5, 0.07),
                (7.0744, -54.5, 10200, -55, 0.6), (7.227, -39.5, 10300, -42.5, 0.5)]
    # (time [s], tick level [dB], brightness [0-1])
    bounces = [(2.017, -53, 0.65), (4.092, -58, 0.1), (4.224, -44.5, .1), (4.014, -58, 1), (5.53, -54, 0.5),
               (5.705, -43.5, 0.34), (7.196, -53, 0.4), (5.1597, -42, 0), (5.3093, -55, 0.3),
               (5.417, -45, 0.22), (6.964, -46.5, 0.28), (7.005, -49.5, .5)]
    # (frequency [Hz], level [dB])
    brass = [(3000, -9), (5000, 3.5), (6500, -8), (8500, -3.5), (10500, 6), (13500, 1.5), (15500, -2)]
    flat = [(s, db, 10400, db - 27.0, bright) for s, db, bright in bounces]
    s, tick_db, hz, ring_db, bright = np.transpose(list(landings) + flat)[:, :, None]
    grit = white(len(s)) * (fade(T, 0.0039) + 0.074 * fade(T, 0.043))
    share = np.clip(bright, 0, 1)
    dull = colour(grit, SNAP, [(2100, 1000, 15), (6500, 2000, -10)])
    tick = rack_gain(tick_db) * (share * colour(grit, brass) + (1 - share) * dull)
    waver = np.cumsum(patchy(np.ones(grit.shape), .015, size=400), axis=1) / SR
    lower_hz = hz - 110 + 25 * spread(len(s))
    pair = np.sin(2 * np.pi * hz * waver) + .5 * np.sin(2 * np.pi * lower_hz * waver)
    ring = rack_gain(ring_db - 11) * patchy(pair, 3, size=600) * fade(T, 0.26)
    add(out, s[:, 0], tick + ring)


def far_gun(out):
    # (time [s], level [dB])
    distant = [
        (5.551, -28.5),
        (4.05, -52),
    ]
    s, db = np.transpose(distant)[:, :, None]
    spectrum = [(200, -4.5), (700, -1.0), (2500, -5.5), (4300, -11.5), (5000, -24), (8000, -21.5), (15000, -33)]
    t60s = [(500, 0.22), (2500, 0.17), (8000, 0.1)]
    tail = burst(white(len(s)), spectrum, t60s, 0.00093, [(691, 140, 5.4), (1856, 150, 3)])
    add(out, s[:, 0], rack_gain(db) * tail * (1 + 0.98 * fade(T, 0.015) + 0.66 * fade(T - .0065, 0.026)))
    add(out, s[0] + .0062, rack_gain(db[:1] + 9) * puff(T, 2200, 900, .002))


def scene():
    out = np.zeros(N + 2 * LENGTH)
    for source in (thuds, snaps, carbine, far_bank, swells, cases, far_gun):
        source(out)
    bass_cut_events = signal.sosfilt(signal.butter(3, 105, "high", fs=SR, output="sos"), out[:N])
    return (bass_cut_events + air() + diaphragm())[None]


def low_pass(x):
    return signal.sosfilt(signal.butter(12, 16470, fs=SR, output="sos"), x)


def record(dry):
    loud = 0.69 * np.tanh(dry / 0.68) * 0.87
    loud = loud + 0.019 * np.tanh(dry / 0.57) ** 4
    top_cut = signal.ellip(10, .2, 55, 15400, fs=SR, output="sos")
    bass_cut = signal.butter(1, 12, "high", fs=SR, output="sos")
    held = np.clip(signal.sosfilt(np.vstack([top_cut, bass_cut]), loud), -.7, .7)
    return low_pass(held)


dry = scene()
out = record(dry)
waveform_to_disk(out)
```